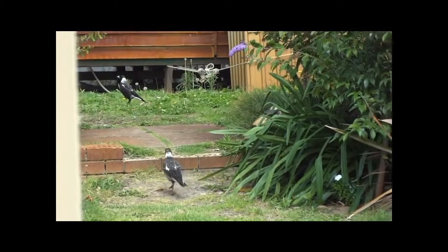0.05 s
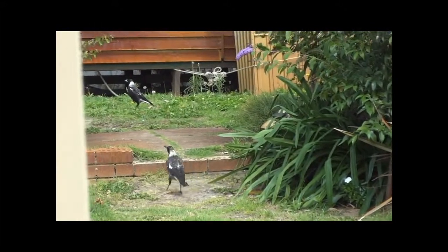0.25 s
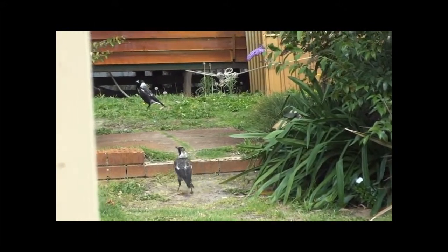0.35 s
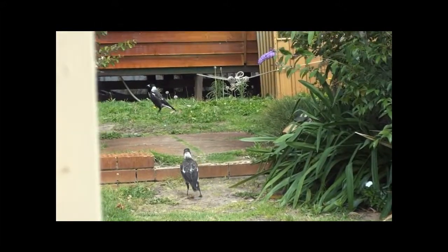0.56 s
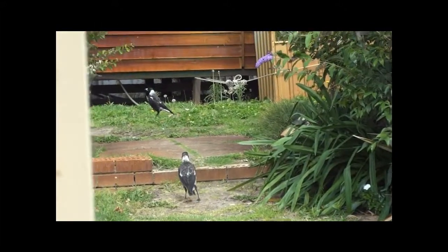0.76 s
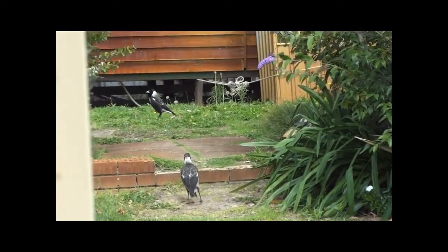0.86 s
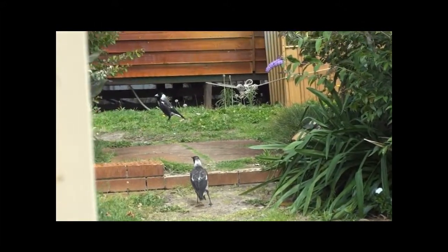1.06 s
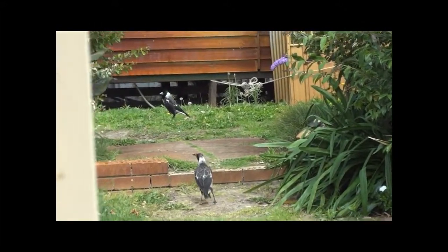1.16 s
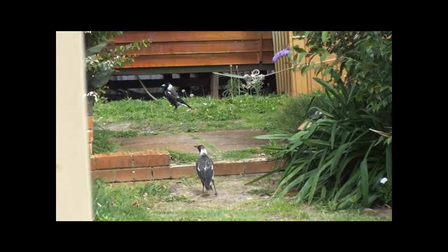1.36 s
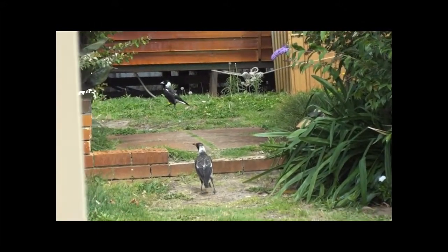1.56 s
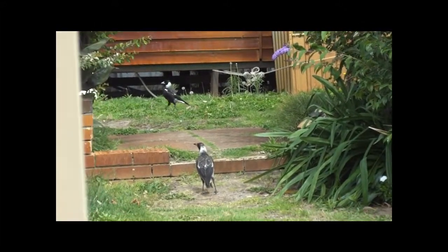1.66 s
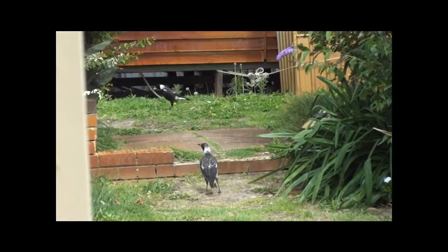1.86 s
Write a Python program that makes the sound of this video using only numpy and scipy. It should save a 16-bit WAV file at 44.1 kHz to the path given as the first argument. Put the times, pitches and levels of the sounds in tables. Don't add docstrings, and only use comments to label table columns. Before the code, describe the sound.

Six rapid, upswept bird chirps ring off close garden walls above a faint, throbbing distant rumble

```python
import sys
import numpy as np
from scipy import signal
from scipy.io import wavfile
from scipy.ndimage import uniform_filter1d

SR = 44100
rng = np.random.default_rng(int(sys.argv[2]) if len(sys.argv) > 2 else 0)


def decibels_to_gain(level_db):
    exponent = np.asarray(level_db, float) / 20
    return 10 ** exponent


def put_to_file(sound):
    columns = np.atleast_2d(sound).T
    safe = np.clip(columns, -1, 1)
    whole_steps = np.round(safe * 32767)
    wavfile.write(sys.argv[1], SR, whole_steps.astype(np.int16))


N = 83790
AIR_DB = -67


def evened(x):
    return x / np.sqrt(np.mean(x ** 2) + 1e-20)


def read(points, hz):
    f, value = np.transpose(points)
    return np.interp(np.log(hz + 1), np.log(f + 1), value)


def add(mix, s, sound):
    part = mix[round(s * SR):][:len(sound)]
    part += sound[:len(part)]


def drift(count, size):
    return evened(uniform_filter1d(uniform_filter1d(rng.standard_normal(count), size), size))


def noise(spectrum, patchy_db):
    # (frequency [Hz], correlation [-1 to 1])
    likeness = [(30, .99995), (90, .999), (200, 0.89), (550, 0.73), (1650, 0.66), (4000, 0.51),
                (7000, 0.83), (15000, 1)]
    frames, hz = N // 256 + 5, np.fft.rfftfreq(1024, 1 / SR)
    a, b, c, d, patches = rng.standard_normal((frames, 513, 5)).T
    patches = uniform_filter1d(patches, 10, 0)
    patches = evened(uniform_filter1d(patches, 14, 1))
    same = np.clip(read(likeness, hz), -1, 1)[:, None]
    mid = np.sqrt((1 + same) / 2) * (a + 1j * b)
    side = np.sqrt((1 - same) / 2) * (c + 1j * d)
    shape = decibels_to_gain(read(spectrum, hz))
    z = np.array([mid + side, mid - side]) * shape[:, None] * decibels_to_gain(patchy_db * patches)
    sound = evened(signal.istft(z, nperseg=1024, noverlap=768)[1][:, :N])
    share = np.sqrt(np.sum(shape[hz > 200] ** 2) / np.sum(shape ** 2))
    return sound / share


def traffic():
    # (frequency [Hz], density [dB per Hz])
    rumble = [(20, -28), (36, 6.5), (70, -10.5), (190, -9), (330, -14.5), (520, -14.5), (870, -14.5),
              (2500, -33)]
    # (time [s], level [dB])
    passing = [(0.0, -46), (0.344, -45.5), (0.492, -46.5), (0.508, -46.5), (0.55, -46), (1.856, -46.5),
               (1.9, -47)]
    t = np.arange(N) / SR
    s, db = np.transpose(passing)
    swell = decibels_to_gain(np.interp(t, s, db - db.mean()))
    fade_in = np.minimum(t / 0.024 + 0.64, 1)
    return fade_in * decibels_to_gain(-45) * swell * noise(rumble + [(9000, -59)], patchy_db=1.98)


def air():
    # (frequency [Hz], density [dB per Hz])
    hiss = [(1000, -13), (2000, -14.5), (3000, -11), (5000, -6.5), (8000, -11.5), (12000, -10),
            (15500, -14.5)]
    return decibels_to_gain(AIR_DB) * noise([(300, -63.5)] + hiss, patchy_db=.5)


def engine():
    # (time [s], frequency [Hz], level [dB])
    throb_high = [(0.0, 60, -76), (0.046, 53.8, -48), (0.454, 55.9, -36.5), (0.91, 52.82, -43.5),
                  (1.02, 48.3, -51), (1.45, 47.87, -46.5), (1.554, 57, -54), (1.814, 52.3, -57),
                  (1.9, 47.6, -57)]
    throb_low = [(0.0, 45.6, -70), (0.052, 46.2, -44), (0.248, 44.96, -51), (0.656, 42, -39),
                 (1.062, 41.8, -39.5), (1.084, 42.6, -59), (1.328, 40.7, -37), (1.824, 41.96, -73),
                 (1.9, 42.7, -47)]
    drone = [(0.0, 165, -75), (0.03, 170.4, -46.5), (0.316, 168.8, -40.5), (0.406, 167.8, -58.5),
             (0.496, 165.2, -39), (0.528, 162, -60.5), (0.93, 170.7, -52), (1.0, 170.9, -60),
             (1.386, 176.8, -54), (1.46, 165.2, -49), (1.634, 176.4, -84), (1.9, 169.3, -50.5)]
    whine = [(0, 375, -56), (0.269, 375, -64), (.32, 375, -42.5), (0.401, 374, -67), (0.502, 374, -55.5),
             (0.652, 368, -62), (1.9, 374, -63.5)]
    hum = [(0, 76.1, -59), (0.901, 76, -50.5), (1.9, 76.3, -53)]
    t, out = np.arange(N) / SR, np.zeros(N)
    for curve in throb_high, throb_low, drone, whine, hum:
        s, hz, db = np.transpose(curve)
        level = np.sqrt(2) * decibels_to_gain(np.interp(t, s, db))
        turns = np.cumsum(np.interp(t, s, hz)) / SR
        out += level * np.sin(2 * np.pi * turns)
    return out


def tick(start, db, hz, decay):
    t, width_hz = np.arange(3000) / SR, 2200
    limits = [hz - width_hz, min(hz + width_hz, .45 * SR)]
    band = signal.butter(2, limits, "band", fs=SR, output="sos")
    puff = evened(signal.sosfilt(band, rng.standard_normal(3000)))
    return start, decibels_to_gain(db) * puff * np.exp(-t / decay)


def note(start, length, effort_db, low_hz, top_hz):
    # (multiple of the pitch, level [dB])
    partials = [(1, -4), (2, -3.3), (3, -25), (4, -24.5), (5, -27.5)]
    # (frequency [Hz], gain [dB])
    beak = [(1700, -16), (2300, -7), (3000, 0), (3600, -5), (6000, 0), (8000, -10), (12000, 0), (16000, -3)]
    attack_s, release_s = .007, 0.011
    climb_hz_per_s, drop_hz_per_s, knee_hz = 48000, 43000, 125
    t = np.arange(0, length + 3 * release_s, 1 / SR)
    waver = .0045 * drift(4000, size=40)[:len(t)]
    flutter_db = 3.5 * drift(4000, size=120)[:len(t)]
    breath = decibels_to_gain(-23) * drift(4000, size=7)[:len(t)]

    to_climb = top_hz - low_hz - climb_hz_per_s * t
    hz = top_hz - knee_hz * np.logaddexp(0, to_climb / knee_hz)
    level_db = effort_db - 13 * (top_hz - hz) / 1250 + flutter_db
    letting_go = np.maximum(t - length + release_s / 2, 0)
    hz = np.maximum(hz - drop_hz_per_s * letting_go, low_hz / 2) * (1 + waver)
    turns = np.cumsum(hz) / SR

    tone = np.zeros(len(t))
    for k, db in partials:
        shrill_db = (k > 2.5) * .9 * (level_db + 23.5)
        tone += decibels_to_gain(db + read(beak, k * hz) + shrill_db) * np.sin(2 * np.pi * k * turns)
    attack = np.minimum(t / attack_s, 1)
    release = np.exp(-(np.maximum(t - length + release_s, 0) / release_s) ** 2)
    return start, tone * (1 + breath) * attack * release * decibels_to_gain(level_db)


def yard(x):
    # (frequency [Hz], 60 dB decay time [s])
    ring = [(2000, .6), (2700, .68), (3100, .48), (5500, .38), (9000, .33), (15000, .28)]
    t = np.arange(SR // 2) / SR
    hz, frame, z = signal.stft(rng.standard_normal((2, len(t))), SR, nperseg=256)
    decay = decibels_to_gain(-60 * frame / read(ring, hz)[:, None])
    tail = signal.istft(z * decay, SR, nperseg=256)[1][:, :len(t)]
    tail = tail * np.minimum(t / 0.0067, 1)
    tail = decibels_to_gain(-12) * tail / np.linalg.norm(tail[0])
    near = rng.standard_normal((2, len(t))) * decibels_to_gain(-60 * t / 0.26)
    near = decibels_to_gain(-1) * near / np.linalg.norm(near[0])
    ground = rng.standard_normal((2, len(t))) * decibels_to_gain(-60 * t / .055)
    ground = decibels_to_gain(1.5) * ground / np.linalg.norm(ground[0])
    direct = decibels_to_gain(-1.5) * (t == 0)

    mid = tail[0] + near[0] + direct + ground[0]
    side = decibels_to_gain(-12.5) * (tail[1] + near[1] + .3 * ground[1])
    pan = decibels_to_gain(np.array([[0.46], [-0.46]]))
    taps = pan * np.array([mid + side, mid - side])
    return signal.fftconvolve(x[None], taps, axes=1)[:, :N]


def leaves():
    # (time [s], level [dB])
    rustle = [(1.15, -58), (1.368, -60), (1.508, -77), (1.9, -55.5)]
    s, db = np.transpose(rustle)
    stir_db = np.interp(np.arange(N) / SR, [0, s[0] - .2, *s], [0, 0, *(db - db.min())])
    rise = np.sqrt(np.maximum(decibels_to_gain(stir_db) ** 2 - 1, 0))
    bright = [(3000, -30.5), (9000, 7.0), (13000, -4), (16000, -18)]  # (frequency [Hz], density [dB per Hz])
    return decibels_to_gain(AIR_DB - 20.5) * rise * noise(bright, patchy_db=4)


def far_note(start, length, db, first_hz, last_hz):
    t = np.arange(0, length, 1 / SR)
    hz = first_hz + (last_hz - first_hz) * t / length
    blur = decibels_to_gain(5.0 * drift(8000, size=90)[:len(t)])
    swell = np.sin(np.pi * t / length) ** .5
    return start, decibels_to_gain(db) * blur * swell * np.sin(2 * np.pi * np.cumsum(hz) / SR)


def scene():
    # (start [s], level [dB], centre [Hz], decay [s])
    snaps = [
        (.29, -67, 12000, .004),
        (1.063, -59, 11000, .005),
        (1.39, -68, 11000, .015),
        (1.432, -57, 10800, .007),
        (1.44, -64, 10000, .03),
        (1.787, -59, 10800, .007),
        (1.795, -65, 10000, .03),
        (1.888, -66, 10000, .01),
    ]
    # (start [s], length [s], effort [dB], first pitch [Hz], top pitch [Hz])
    song = [
        (.656, .043, -25, 2350, 2925),
        (.727, .055, -23, 1750, 2985),
        (.808, .05, -19, 1750, 3110),
        (.888, .05, -19, 1750, 3030),
        (.972, .045, -20, 1750, 3000),
        (1.076, .04, -29, 1750, 2740),
    ]
    # (start [s], length [s], level [dB], first pitch [Hz], last pitch [Hz])
    far_song = [
        (1.46, .07, -71, 4000, 4200),
        (1.54, .125, -69, 4300, 4050),
        (1.8, .03, -64, 2950, 3050),
        (1.835, .075, -65, 3050, 3600),
        (1.8, .03, -65, 2450, 2500),
    ]
    mix, small = traffic() + air() + engine() + leaves(), np.zeros(N)
    for row in snaps:
        add(small, *tick(*row))
    for row in song:
        bird = np.zeros(N)
        add(bird, *note(*row))
        mix = mix + yard(bird)
    for row in far_song:
        add(small, *far_note(*row))
    return mix + small


def roll_off(x):
    return signal.sosfilt(signal.butter(12, 16730, fs=SR, output="sos"), x)


def record(dry):
    rumble_cut = signal.butter(2, 33, "high", fs=SR, output="sos")
    treble_cut = signal.firwin(511, 15850, window=("kaiser", 9), fs=SR)
    firm = signal.sosfilt(rumble_cut, dry)
    mix = signal.oaconvolve(firm, treble_cut[None], "same")
    return roll_off(mix)


dry = scene()
out = record(dry)
put_to_file(out)
```